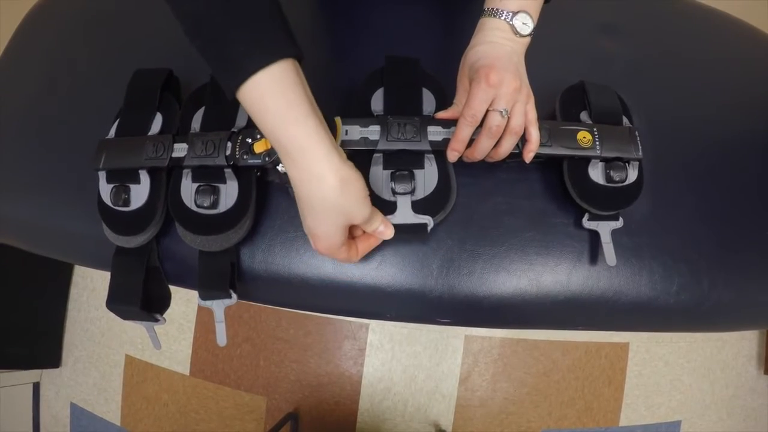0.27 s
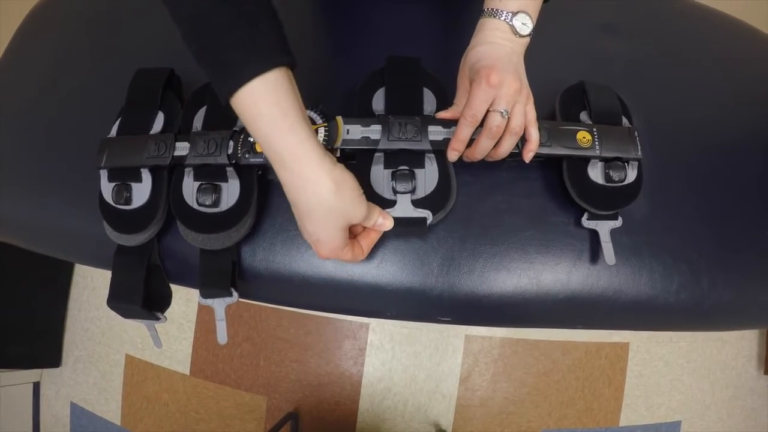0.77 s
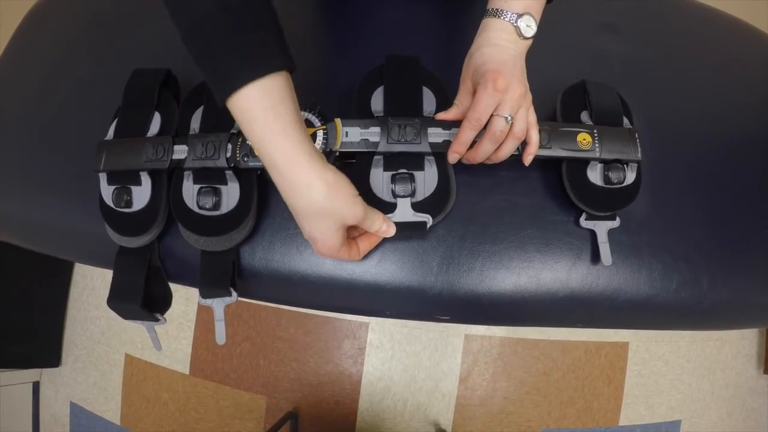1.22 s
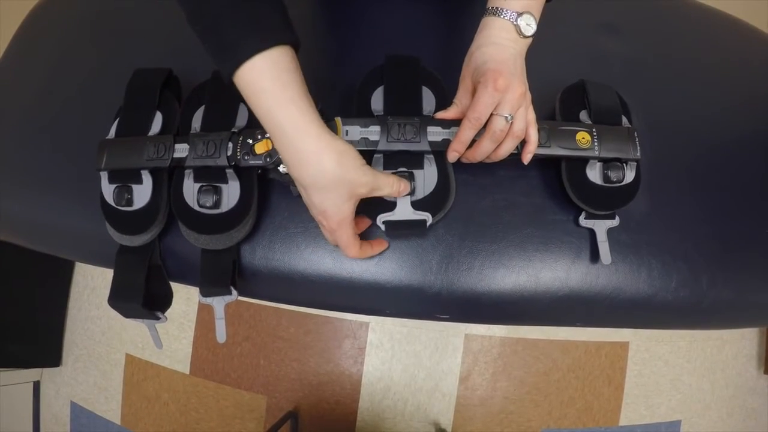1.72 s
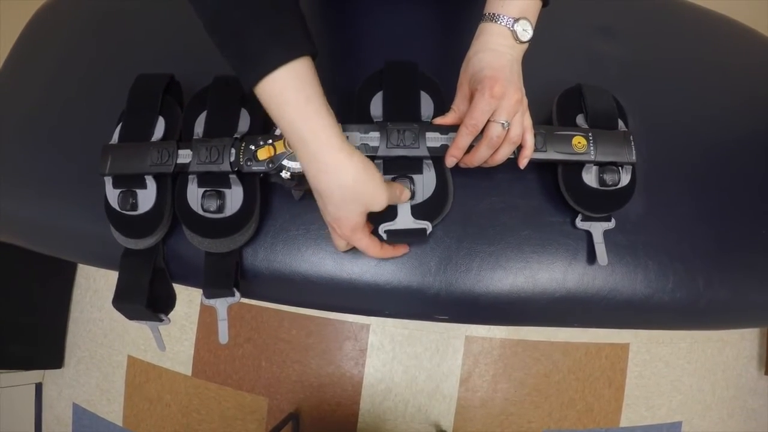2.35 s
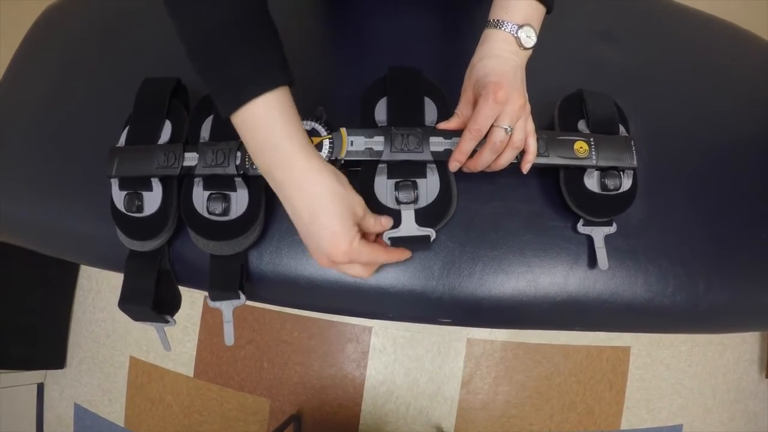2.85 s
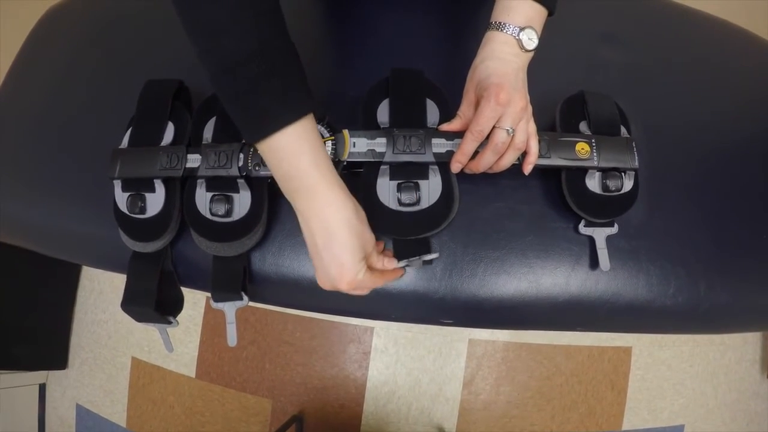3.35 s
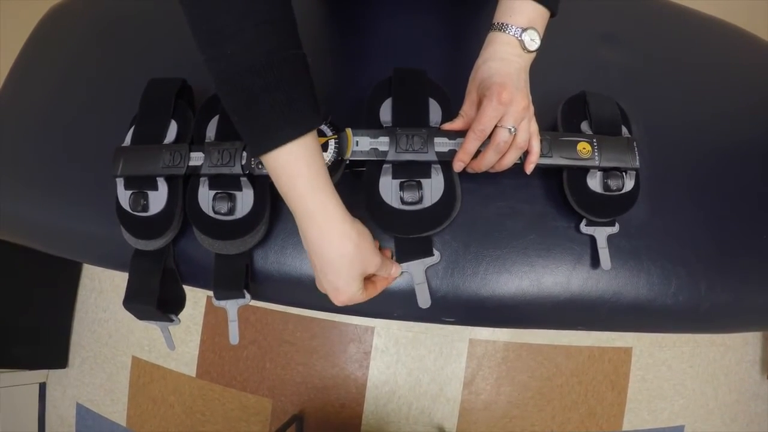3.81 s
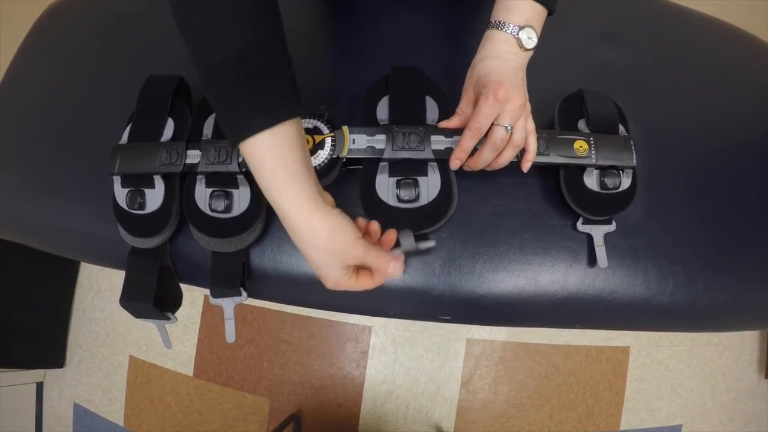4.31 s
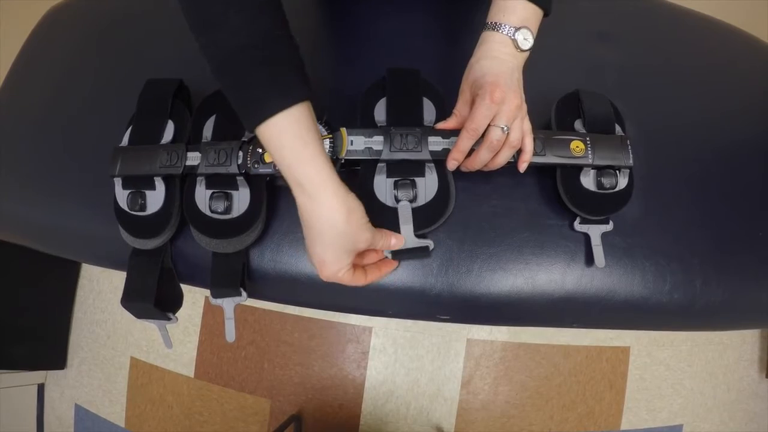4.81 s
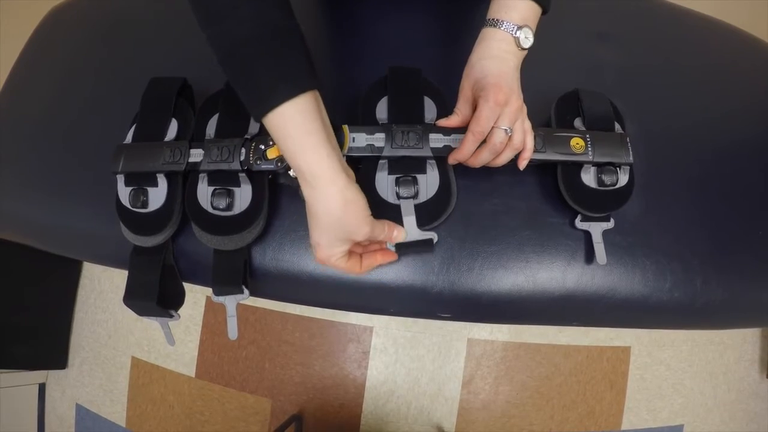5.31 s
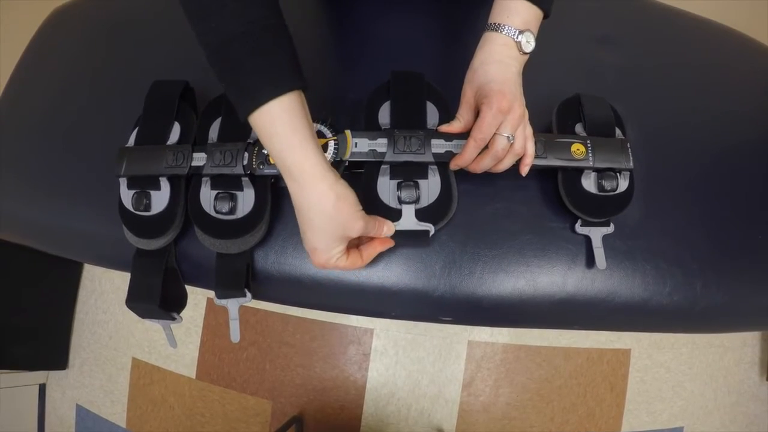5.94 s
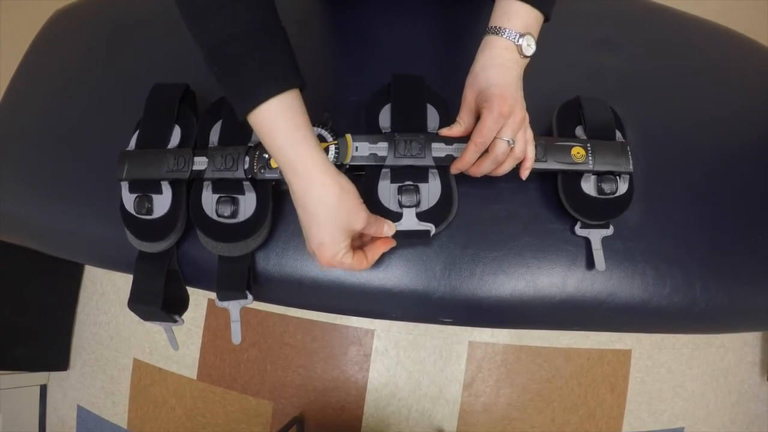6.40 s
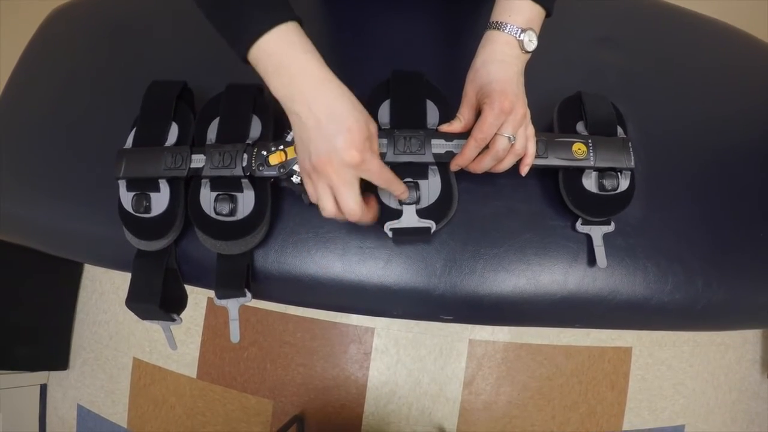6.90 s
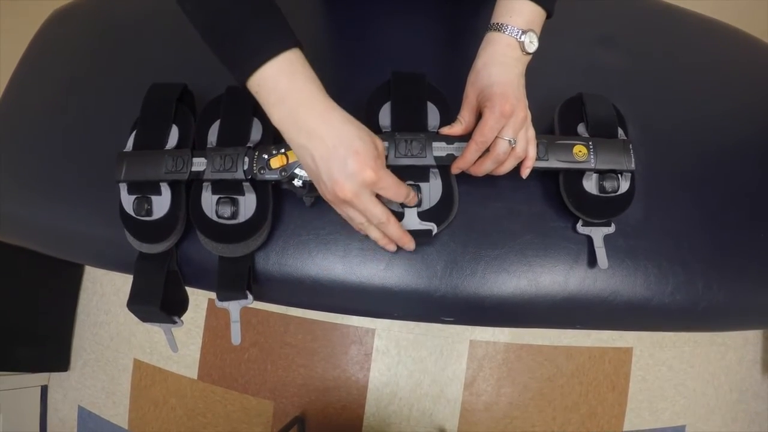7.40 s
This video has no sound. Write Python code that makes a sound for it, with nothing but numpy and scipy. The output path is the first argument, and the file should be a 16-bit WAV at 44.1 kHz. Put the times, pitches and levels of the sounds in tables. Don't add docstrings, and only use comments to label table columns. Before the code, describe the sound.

A quiet indoor room with low, wavering ventilation rumble, thin air noise and a faint low electrical hum. From 0.1 to 0.4 seconds fingers rub a strap and tick hard plastic. At 0.62 a loud, bright buckle snap cracks, with a tiny rattle, a dull table knock and a short hard-walled echo; hiss rises slightly for under half a second. A small tick follows at 0.78 and soft pats near 1.1, then near quiet. At 2.49 a tight cluster of clicks snaps, with lighter ticks around 2.7. Faint scrapes lead to a third, somewhat softer snap with a low thump at 3.47, and a tick at 3.78. From 4.3 to 6.1 there are only faint rustles, pats and tiny clicks. At 6.23 the loudest, sharpest snap lands, with a smaller click at 6.30. Sparse soft touches end it, one clearer tick at 7.28.

```python
import sys
import numpy as np
from scipy import signal
from scipy.fft import rfft, irfft, next_fast_len
from scipy.io import wavfile
from scipy.ndimage import uniform_filter1d

SR = 44100
rng = np.random.default_rng(int(sys.argv[2]) if len(sys.argv) > 2 else 0)


def rack_gain(trim_db):
    fader = np.asarray(trim_db, float)
    return 10 ** (fader / 20)


def to_wav(sig):
    pcm = np.clip(np.atleast_2d(sig), -1, 1) * 32767
    pcm = np.round(pcm).astype(np.int16)
    wavfile.write(sys.argv[1], SR, pcm.T)


N = 337806


def unit(x):
    return x / np.sqrt(np.mean(x ** 2) + 1e-20)


def along(points, hz):
    f, v = np.transpose(points)
    return np.interp(np.log(hz + 1), np.log(f + 1), v)


def curves(rows):
    s, *columns = np.transpose(rows)
    return [np.interp(np.arange(N) / SR, s, column) for column in columns]


def filtered(x, response):
    m = next_fast_len(len(x) + 4096)
    return irfft(rfft(x, m) * response(np.fft.rfftfreq(m, 1 / SR)), m)[:len(x)]


def modes(rows):
    def response(f):
        total = 0
        for k, (centre, width, db) in enumerate(rows):
            peak = 1j * f * width / (centre * centre - f * f + 1j * f * width)
            total = total + (-1) ** k * rack_gain(db) * peak
        return total
    return response


def causal(points, size=1024):
    c = irfft(np.log(rack_gain(along(points, np.fft.rfftfreq(size, 1 / SR)))))
    c[1:size // 2] *= 2
    c[size // 2 + 1:] = 0
    x = irfft(np.exp(rfft(c)))[:size // 2]
    return x / np.abs(x).max()


def rush(spectrum, patchy_db=0, grain_db=0):
    grains = uniform_filter1d(rng.standard_normal(N), size=60)
    z = signal.stft(rng.standard_normal(N) * rack_gain(grain_db * unit(grains)), nperseg=512)[2]
    patches = uniform_filter1d(rng.standard_normal(z.shape), size=8, axis=0)
    patches = uniform_filter1d(patches, size=8, axis=1)
    x = signal.istft(z * rack_gain(patchy_db * unit(patches)), nperseg=512)[1][:N]
    return unit(filtered(x, lambda hz: rack_gain(along(spectrum, hz))))


def add(track, s, sound):
    at = round(s * SR)
    track[at:at + len(sound)] += sound[:len(track) - at]


def room(sound, wet_db, direct_db=0):
    # pitch_hz, t60_s
    walls = [(300, .35), (1500, 0.31), (3000, 0.3), (5500, 0.25), (8000, 0.21), (11000, 0.24),
             (15000, 0.18)]
    # delay_s, level_db
    echoes = [(.0030, -23.5), (.0078, -18.5), (.0086, -11.5), (.0096, -17), (0.0117, -21), (0.0123, -20),
              (.0152, -20)]
    # pitch_hz, level_db
    aslant = [(500, -1), (1200, -2), (2200, 0), (3000, -3), (3750, -4), (4600, 6), (5400, 1.5), (6500, -4),
              (8300, -2), (12000, -1.5), (16000, 1)]
    hz, t, z = signal.stft(rng.standard_normal(SR // 2), SR, nperseg=256)
    tail = signal.istft(z * rack_gain(-60 * t / along(walls, hz)[:, None]), SR, nperseg=256)[1]
    t = np.arange(len(tail)) / SR
    tail = tail * np.clip((t - .007) / 0.0071, 0, 1)
    arrivals = unit(uniform_filter1d(rng.standard_normal(len(t)), size=30))
    scatter_db, scatter_t60_s = 2.5, .5
    tail = tail * rack_gain(scatter_db * rack_gain(-60 * t / scatter_t60_s) * arrivals)
    answer = rack_gain(wet_db) * tail / np.linalg.norm(tail)
    for delay, db in echoes:
        answer[round(delay * SR)] += rack_gain(db + rng.normal(0, 1.0))
    answer = np.convolve(answer, causal(aslant, size=256))
    answer[0] += rack_gain(direct_db)
    return signal.fftconvolve(sound, answer)


def ventilation():
    # time_s, level_db
    rumble_levels = [(0.0, -59), (2.37, -58), (2.45, -62), (4.39, -56), (4.5, -67), (4.57, -49.5),
                     (4.8, -59), (5.21, -57.5), (5.33, -48), (5.37, -52.5), (5.95, -63), (5.99, -57),
                     (6.7, -59.5), (6.78, -44), (6.85, -53.5), (7.27, -57.5), (7.3, -64.5), (7.66, -55)]
    # pitch_hz, level_db per Hz
    duct = [(10, -13.5), (25, 2), (40, -2), (60, -5.5), (80, -14.5), (120, -61)]
    # pitch_hz, level_db per Hz
    air = [(41, -29), (70, -5), (145, -19.5), (264, -18), (355, -28.5), (477, -26.5), (657, -31.5),
           (704, -27.5), (789, -31.5), (948, -31), (1140, -33), (15100, -46.5), (16500, -62.5)]
    # pitch_hz, width_hz, level_db
    hum_settings = (120, 29, -65)
    hum_hz, width_hz, hum_db = hum_settings
    wavering = unit(filtered(rng.standard_normal(N), modes([(hum_hz, width_hz, 0)])))
    steady = np.sin(2 * np.pi * hum_hz * np.arange(N) / SR)
    hum = 0.48 * wavering + .9 * steady
    rumble = rack_gain(curves(rumble_levels)[0] + 1.0) * rush(duct)
    return rumble + rack_gain(hum_db) * hum + rack_gain(-65.5) * rush(air, patchy_db=1.6)


def pat(hz, t60):
    t = np.arange(SR // 10) / SR
    force = rack_gain(-18.5 - 60 * t / np.clip(t60, .005, .2)) * rng.standard_normal(len(t))
    force[0] += 1
    soft = 1.6
    pad = modes([(hz, 1.3 * hz, 0)])
    x = filtered(force, lambda f: pad(f) ** 2 / (1 + 1j * f / (soft * hz)) ** 2)
    return x / np.abs(x).max()


def fingers():
    # time_s, peak_db, pitch_hz, t60_s
    pats = [(0.282, -57.5, 694, 0.02), (0.3345, -53.5, 1500, 0.03), (0.347, -54, 1240, 0.059),
            (0.568, -64, 775, 0.018), (0.774, -53, 1060, 0.02), (1.049, -52.5, 570, 0.019),
            (1.119, -50, 754, 0.018), (1.13, -53.5, 597, 0.017), (1.642, -57.5, 457, 0.036),
            (2.076, -61, 696, 0.018), (2.323, -60, 397, 0.029), (2.413, -59.5, 473, 0.046),
            (2.657, -49, 630, 0.033), (3.249, -56, 470, 0.02), (3.397, -57.5, 554, 0.019),
            (3.4755, -48.5, 800, 0.015), (3.989, -66.5, 403, 0.026), (4.28, -53.5, 695, 0.011),
            (4.719, -60, 1696, 0.033), (4.933, -58, 666, 0.02), (1.142, -61, 850, 0.028),
            (5.23, -63.5, 1990, 0.018), (5.408, -58, 1090, 0.02), (5.64, -59, 1105, 0.018),
            (5.882, -59.5, 945, 0.02), (6.104, -64, 710, 0.016), (6.863, -64, 431, 0.019),
            (7.276, -57, 900, 0.023), (7.42, -56.5, 447, 0.022), (7.53, -58, 600, 0.015)]
    # time_s, peak_db, pitch_hz, t60_s
    thumps = [
        (0.626, -59.5, 261, 0.08),
        (1.128, -53, 260, 0.04),
        (2.492, -47.5, 241, 0.091),
        (3.476, -49, 187, 0.096),
        (3.49, -54, 157, 0.092),
        (0.622, -56.5, 170, .03),
        (1.131, -55.5, 270, 0.017),
        (1.048, -64, 240, .02),
    ]
    # time_s, pressure_db
    contact = [(0, -90), (0.4, -87), (0.55, -71.5), (1.0, -76.5), (1.45, -79.5), (1.75, -74.5), (1.85, -80),
               (2.45, -71), (2.95, -73), (3.2, -84.5), (3.9, -71.5), (4.25, -88.5), (4.5, -73), (5.0, -77),
               (5.2, -70), (5.7, -82.5), (6.25, -75.5), (7.0, -78)]
    # peak_s, peak_db, fade_db per s, scrape_db against the peak
    stroke_rows = [(0.14, -65, 42, -6), (0.227, -60.5, 84, -19), (0.349, -51.5, 500, -8),
                   (0.376, -60.5, 167, 5), (0.86, -84, 202, -6), (1.111, -63, 150, -8),
                   (1.515, -63.5, 175, -9), (1.64, -74.5, 113, -4), (2.76, -67, 295.5, 1),
                   (2.885, -66.5, 147, -8), (3.27, -65.5, 108.5, -2), (3.33, -65, 40, -7),
                   (3.405, -64, 110, 2.5), (3.46, -62, 61, -12), (3.771, -71.5, 42, -5),
                   (4.396, -60.5, 144, -5.5), (4.558, -65.5, 85, -13), (4.649, -64.5, 120, -9),
                   (4.724, -58, 260, -9), (4.897, -62.5, 218, -3), (4.927, -58, 800.5, -1),
                   (5.56, -64.5, 59, -3), (5.797, -72, 48, -9), (5.889, -66, 165, 1), (6.21, -69, 61, -5),
                   (6.769, -69.5, 249.5, -10), (7.068, -81.5, 84, -8), (7.285, -82, 75.5, -6),
                   (7.549, -66.5, 162, -21.5)]
    # pitch_hz, level_db per Hz
    fizz_colour = [(4000, -39.5), (6500, -12), (7300, -4.5), (8300, -0.5), (9500, -7.5), (10700, -11),
                   (14200, -16), (16500, -22)]
    # pitch_hz, level_db per Hz
    scrape_colour = [(3500, -47), (4800, -22.5), (5600, -5), (6400, -0.5), (7100, -11), (9000, -35.5)]
    # pitch_hz, level_db per Hz
    body_colour = [(500, -35), (1200, 4), (2500, 1), (3800, 3), (5000, -16), (7000, -45)]
    x, t = np.zeros(N), np.arange(N) / SR
    for s, db, hz, t60 in [*pats, *thumps]:
        add(x, s, rack_gain(db + 3.5) * pat(hz, t60))
    rest = rack_gain(curves(contact)[0])
    rise_faster = 1.28
    strokes = np.array([rack_gain(db - fade * np.maximum(t - s, rise_faster * (s - t)))
                        for s, db, fade, _ in stroke_rows])
    stroking = strokes.max(axis=0)
    peaks, shares = rack_gain(np.array(stroke_rows)[:, [1, 3], None]).transpose(1, 0, 2)
    scraping = (peaks * shares * (strokes / peaks) ** 1.5).max(axis=0)
    fizz = np.hypot(rest, stroking) * rush(fizz_colour, patchy_db=2.0, grain_db=2.0)
    scrape = np.hypot(rack_gain(-6.5) * rest, scraping) * rack_gain(-2.0)
    scrape = scrape * rush(scrape_colour, patchy_db=3.5, grain_db=2.5)
    body = np.hypot(rack_gain(-11.5) * rest, rack_gain(-9.5) * stroking)
    body = body * rush(body_colour, patchy_db=1.0, grain_db=2.0)
    return room(x, wet_db=-5.0)[:N] + fizz + scrape + body


def click(shell_hz, shell_db, cheek_db, edge_db, knock_db, shoulder_db=0):
    # pitch_hz, level_db
    mount = [(400, -45.5), (900, -26), (1500, -32.5), (2100, -25), (2550, -27)]
    # pitch_hz, level_db
    hollow = [(3100, -14.5), (3750, -25), (4600, -22)]
    # pitch_hz, level_db
    cheek = [(5300, -11.5), (6300, -2)]
    # pitch_hz, level_db
    tab = [(7100, -6.5), (8300, -0.5), (9400, -8)]
    # pitch_hz, level_db
    edge = [(10500, -11), (12500, -14), (14500, -19.5), (17000, -31)]
    (peak_hz, peak_db), (dip_hz, dip_db), (top_hz, top_db) = hollow
    shift = np.clip(shell_hz, 2750, 3550) / peak_hz
    shell = [(peak_hz * shift, peak_db), (dip_hz * shift, dip_db), (top_hz, top_db + shoulder_db)]
    zones = [(mount, knock_db), (shell, shell_db), (cheek, cheek_db), (tab, 0), (edge, edge_db)]
    return causal(sorted((hz, db + more) for zone, more in zones for hz, db in zone))


def chatter(blow, db, t60, size=700):
    t = np.arange(size) / SR
    return np.convolve(blow, rack_gain(db - 60 * t / t60) * rng.standard_normal(size))


def buckle():
    snaps = [.6222, .62265, 2.4884, 2.4916, 2.49195, 2.4927, 2.4948, 2.4956, 3.4744, 3.4750, 3.4756, 6.2267,
             6.2346, 6.2352, 6.2957, 6.2965]
    # peak_db, then shell_db, cheek_db, edge_db, knock_db against the usual colour
    force_shares = [(-21, -0.04, -9.5, -5, 3.5), (-3, -1.5, -3.5, -1, 1), (-19, 0.3, -3, -6, 7),
                    (-17.5, 0.5, 4.5, 1, -1), (-7.5, 0, -1, -4, -3), (-16, -11, 0, -1, 1),
                    (-8, -12, -6.5, -9.5, -2), (-17, -9, 3.5, -6, 3), (-23, -6, -18, -2, 2),
                    (-18, -2, -6, 0, -2), (-17.5, -11, 0, 3, -3), (-39, 1, -14, -10, 2),
                    (-1, 0, 1.5, 1.5, -0.5), (-7, 1, -3, -4, 3), (-15, 5.5, 0.5, -3.5, 3.5),
                    (-21.5, -7, -9, 4, 0)]
    # from_s,
    # direct_db, shoulder_db, mount_db
    hand = [
        (0, -3, 6.5, -9.5),
        (2, 1, -3, -0.3),
        (3, 2, 3, -0.5),
        (6, -4.5, 3, -8),
        (6.28, 2, 1, -0.6),
    ]
    # time_s, pitch_hz
    grip_points = [(0.3, 2950), (0.63, 3130), (0.77, 3370), (1.1, 2803), (2.1, 3480), (2.55, 3450),
                   (2.62, 2835), (3.4, 3200), (3.45, 2950), (3.6, 2820), (3.76, 3550), (4.74, 2685),
                   (4.9, 3500), (5.9, 3480), (6.12, 2880), (6.4, 3120), (7.2, 3520), (7.53, 2810)]
    # time_s, peak_db, then shell_db, cheek_db, edge_db against the peak
    ticks = [(0.2024, -45, 2, 8, -8), (0.228, -28, -17, -11, -17), (0.3481, -49, -22, 0, -13),
             (0.367, -45, -14, 0, -17), (0.3744, -46, 0, 15, -9), (0.7751, -32, -15, -10, -24),
             (1.1194, -42, -7, -7, -14), (2.6567, -30, -16, -8, -11.5), (2.7046, -32, -20, -13, -17),
             (2.7217, -44, -17, -12, -20), (3.3981, -41.5, -21, -14, -25), (3.7822, -28, -16.5, -18.5, -14),
             (4.5007, -43.5, -34, -17, -12), (4.7172, -41, -11, -31, -34.5), (4.7236, -42, -18, -29, -30.5),
             (4.934, -40, -15, -19, -10), (5.4535, -44.5, -14, -18, -28), (5.5168, -40.5, -19, -15, -18),
             (5.6184, -41, -11, -9, -11), (5.8842, -40, -1.5, -11, -7), (6.121, -45, -30.5, -10, -22),
             (7.0546, -40.5, -29, -21, -20), (7.2764, -33, -11, -9.5, -21.5)]
    # time_s, peak_db
    grazes = [(0.132, -45), (0.138, -52), (0.1985, -38.5), (0.3346, -50), (1.0904, -54), (2.138, -58),
              (2.3218, -53), (2.739, -52), (3.3737, -53), (3.7, -49), (3.9888, -49.5), (4.2829, -45),
              (4.6506, -46), (5.5373, -46), (5.6594, -53), (4.998, -60.5), (5.7864, -55.5), (5.82, -46.5),
              (5.859, -54), (6.7683, -48), (7.5326, -44), (2.4528, -48)]
    # shell_db, cheek_db, edge_db
    graze_colour = (-16, -17, -19.5)
    x, touches = np.zeros(N), np.zeros(N)
    grip = lambda s: np.interp(s, *np.transpose(grip_points))
    for s, (db, shell_db, cheek_db, edge_db, knock_db) in zip(snaps, force_shares):
        _, direct_db, shoulder_db, mount_db = [row for row in hand if row[0] < s][-1]
        blow = rack_gain(db) * click(grip(s), shell_db, cheek_db, edge_db, knock_db, shoulder_db)
        add(x, s, chatter(blow, db=-25, t60=0.016))
        knock = rack_gain(db + knock_db - 52.0) * pat(730, 0.13)
        add(x, s, rack_gain(direct_db) * knock)
        shaded = click(grip(s), shell_db, cheek_db, edge_db, knock_db + mount_db, shoulder_db + mount_db)
        add(x, s, rack_gain(db + direct_db) * shaded)
        add(knock, 0, blow)
        add(x, s, room(knock, wet_db=-3.5, direct_db=-np.inf))
    for s, db, shell_db, cheek_db, edge_db in [*ticks, *[(*row, *graze_colour) for row in grazes]]:
        colour = click(grip(s), shell_db + 19.5, cheek_db + 9.0, edge_db + 15.0, shell_db + 19)
        blow = rack_gain(db + 2.0) * colour
        add(x, s + .0004, chatter(blow, db=-23, t60=0.008))
        add(touches, s + .0004, blow)
    return x + room(rack_gain(-6) * touches, wet_db=-4, direct_db=6)[:N]


def ringing(rows):
    # t60_s, t60_s
    t60_limits = (.002, .018)
    attack_s = 0.00047
    x, t = np.zeros(N), np.arange(SR // 20) / SR
    for s, hz, db, t60 in rows:
        fade = rack_gain(db - 60 * t / np.clip(t60, *t60_limits))
        add(x, s, fade * (1 - np.exp(-t / attack_s)) * np.sin(2 * np.pi * hz * t))
    return x


def parts():
    # time_s, pitch_hz, #
    # peak_db, t60_s
    rings = [(0.6226, 3050, -24, 0.009), (0.631, 3000, -39, 0.011), (2.4884, 2000, -30, 0.0046),
             (2.4884, 14300, -28, .004), (2.492, 850, -36, 0.0075), (2.4916, 10850, -23, .008),
             (2.7, 13300, -30, .006), (2.492, 15400, -29, .004), (3.4748, 844, -36.5, 0.01),
             (6.2957, 14400, -29, .005), (6.2957, 10500, -28, .004), (6.252, 3000, -34, .008),
             (0.636, 6200, -31, .012), (0.635, 9400, -28, .012), (0.6226, 5200, -24, 0.0092),
             (0.6226, 4500, -32, .015), (2.4918, 3500, -31, 0.0084), (2.4918, 7500, -21, .008),
             (3.4744, 8110, -15, 0.009), (3.4746, 10400, -21, 0.013), (3.4756, 6450, -26, 0.013),
             (3.4754, 2820, -35, 0.0091), (3.4756, 5340, -39, 0.015), (6.2346, 3650, -31, 0.0081),
             (6.2346, 4520, -31, 0.009), (6.2957, 2120, -33.5, 0.0075), (6.2957, 4950, -23, 0.0066),
             (6.2957, 9670, -24, 0.0065), (0.6312, 5200, -30, .005), (2.5002, 5500, -24, .008),
             (2.5002, 4500, -36, 0.019), (3.484, 5400, -35, .018), (6.243, 5500, -26, .008),
             (6.238, 11300, -31, 0.0066), (6.238, 13200, -34, .006), (6.238, 4000, -38, .008),
             (0.626, 6900, -31, .01), (0.625, 850, -47, 0.014)]
    # time_s, pitch_hz,
    # peak_db, t60_s
    touch_rings = [(0.132, 6470, -50, .008), (0.3355, 2270, -52.5, .008), (0.3355, 3300, -55, 0.0072),
                   (0.367, 5500, -46, .01), (0.375, 5670, -47.5, .01), (0.391, 5660, -53.5, 0.011),
                   (1.0984, 8180, -50.5, .005), (1.4915, 7880, -48, 0.0055), (0.773, 1900, -47, 0.007),
                   (4.934, 750, -55.5, 0.013), (2.657, 7050, -33.5, 0.007), (2.657, 4950, -51.5, .01),
                   (2.657, 2370, -52, 0.011), (2.658, 800, -50, 0.007), (2.7047, 2860, -47.5, .01),
                   (2.722, 6600, -43, .007), (2.7392, 6520, -45, .006), (3.005, 8000, -53, .004),
                   (3.0683, 8160, -50, .004), (3.233, 8020, -54, .005), (3.233, 6850, -57, .01),
                   (3.2516, 6350, -56, .01), (3.266, 5900, -57, .015), (3.266, 2700, -59, .01),
                   (3.2746, 5900, -55, 0.013), (3.292, 5950, -62, 0.017), (3.353, 6650, -54, .015),
                   (3.353, 2280, -58, .01), (3.362, 6600, -59, .012), (3.375, 6580, -56, .015),
                   (3.3983, 6560, -38, 0.008), (3.3983, 2600, -42, .004), (3.416, 6600, -53, .02),
                   (3.424, 6650, -56, .02), (4.599, 6600, -58, 0.0043), (4.7222, 2650, -56, .02),
                   (4.889, 8240, -48, .005), (4.926, 3620, -63, .02), (4.931, 5900, -57, .012),
                   (5.0695, 7030, -59, .003), (5.4935, 6870, -57, 0.0083), (5.517, 5750, -49.5, .012),
                   (5.517, 3650, -50.5, .01), (5.566, 6390, -57, 0.0091), (5.6185, 2170, -51, 0.0068),
                   (5.8195, 3380, -56.5, .01), (5.883, 6340, -52, 0.011), (0.7734, 7200, -37, .004),
                   (7.422, 7750, -55, .005),
                   (2.7047, 9400, -39, 0.0068), (2.6655, 6200, -47, .006), (2.713, 5400, -45, .006),
                (2.6745, 9300, -51, .005), (3.407, 6500, -48, .008), (3.7852, 8000, -42, 0.0056),
                (3.7825, 3700, -48, 0.0063), (3.3983, 1600, -51, .004), (3.3983, 3100, -48, .004),
                (4.281, 1800, -57, .004), (5.517, 2000, -55, .004), (5.455, 2600, -58, .004),
                (6.2957, 1400, -42, .005), (3.3983, 8600, -48, .004)]
    after_snaps = room(rack_gain(3.5) * ringing(rings), wet_db=-11)
    after_touches = room(rack_gain(3) * ringing(touch_rings), wet_db=-13)
    return (after_snaps + after_touches)[:N]


def input_hiss():
    # from_s, to_s, hiss_db
    steps = [
        (0.624, 1.029, -66),
        (2.491, 2.897, -66),
        (3.463, 3.553, -64),
        (6.238, 6.643, -66.5),
    ]
    # pitch_hz, level_db per Hz
    hiss_colour = [(200, -0.5), (600, 0), (1700, 0), (4000, -2), (8650, -6), (15000, -11.5), (16500, -28)]
    t = np.arange(N) / SR
    gate = sum(rack_gain(db) * ((t > a) & (t < b)) for a, b, db in steps)
    return gate * rush(hiss_colour)


def lose_high_bands(x):
    # from_s, to_s, from_hz, to_hz
    lost = [
        (0.628, 0.694, 13800, 20000),
        (0.638, 0.7, 14500, 20000),
        (0.69, 0.765, 14200, 20000),
        (2.508, 2.56, 15200, 20000),
        (2.56, 2.652, 14300, 20000),
        (2.71, 2.76, 14600, 20000),
        (3.486, 3.55, 13100, 14200),
        (3.495, 3.56, 15300, 20000),
        (6.242, 6.29, 14200, 20000),
    ]
    t = np.arange(N) / SR
    for a, b, low_hz, high_hz in lost:
        start = round(a * SR) - 2048
        near = t[start:round(b * SR) + 2048]
        fade = uniform_filter1d(1.0 * ((near > a) & (near < b)), size=400)
        band = filtered(x[start:start + len(near)], lambda hz: (hz > low_hz) & (hz < high_hz))
        add(x, start / SR, -fade * band)
    return x


def scene():
    return (ventilation() + fingers() + buckle() + parts())[None]


def roll_off(x):
    return signal.sosfilt(signal.butter(12, 16430, fs=SR, output="sos"), x)


def record(dry):
    # pitch_hz, level_db
    treble_shape = [(9700, 0), (10150, -2), (10400, -11), (10700, -1.5), (14300, 0.5), (15800, -4), (16400, -9),
                    (16900, -61.5)]
    x = filtered(dry[0] + input_hiss(), lambda hz: rack_gain(along(treble_shape, hz)))
    x = lose_high_bands(x)
    return roll_off(x[None])


dry = scene()
out = record(dry)
to_wav(out)
```